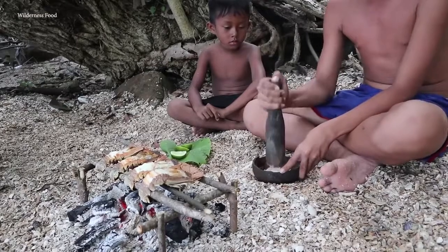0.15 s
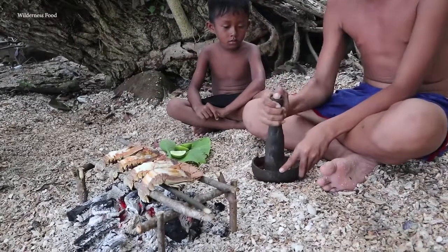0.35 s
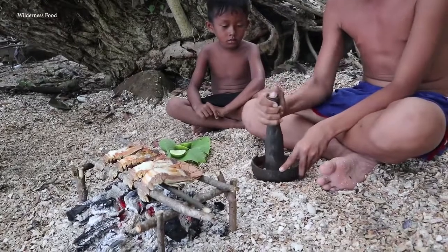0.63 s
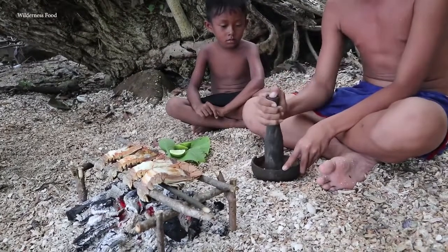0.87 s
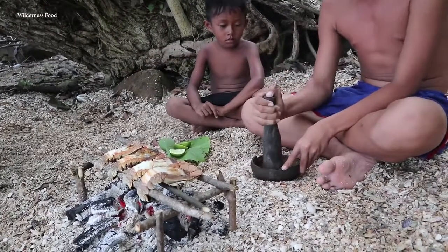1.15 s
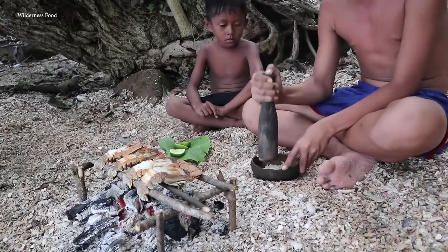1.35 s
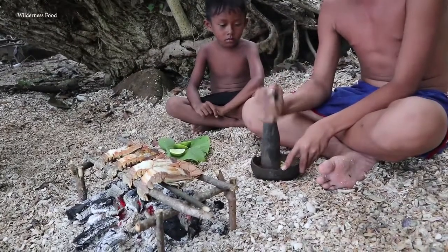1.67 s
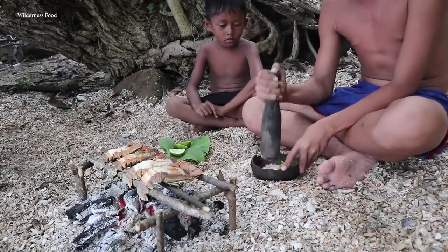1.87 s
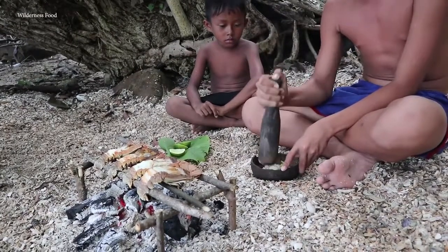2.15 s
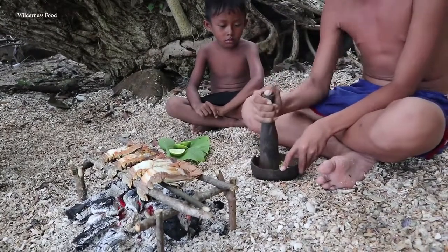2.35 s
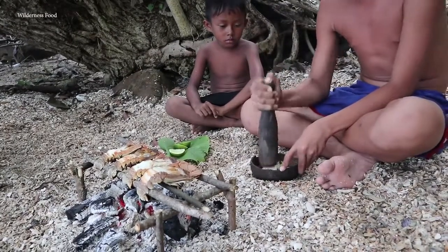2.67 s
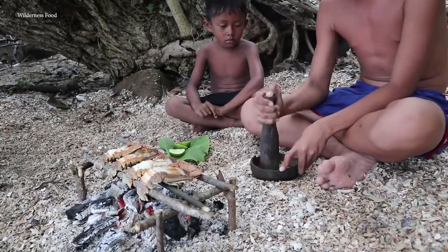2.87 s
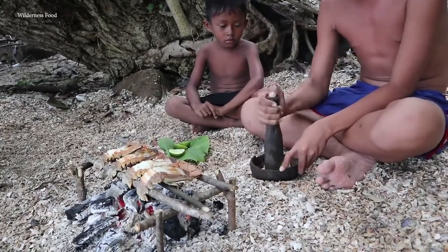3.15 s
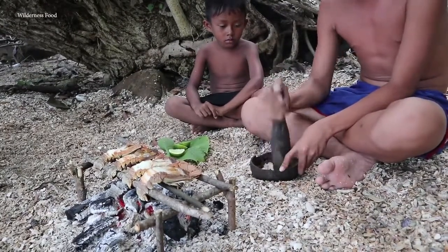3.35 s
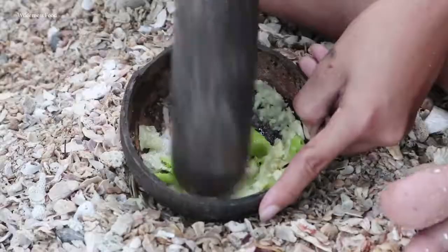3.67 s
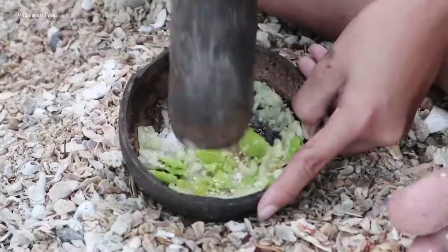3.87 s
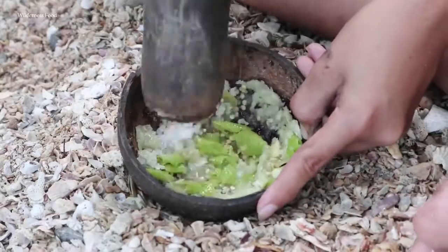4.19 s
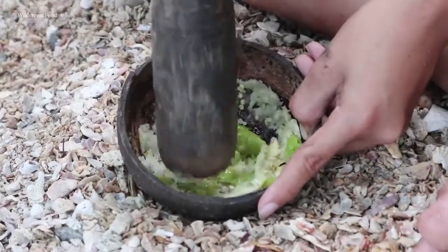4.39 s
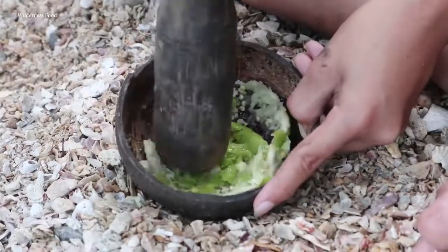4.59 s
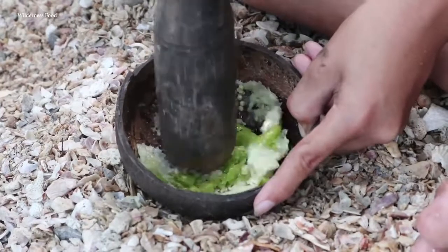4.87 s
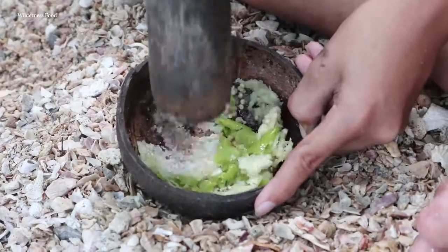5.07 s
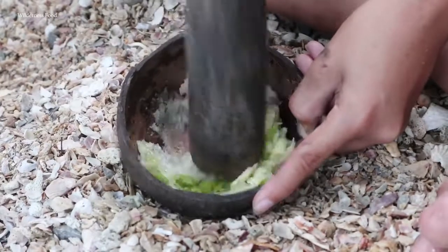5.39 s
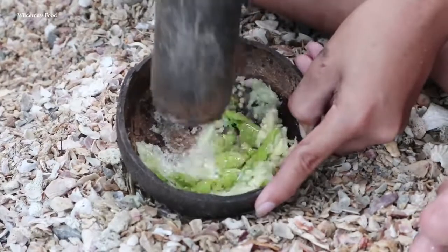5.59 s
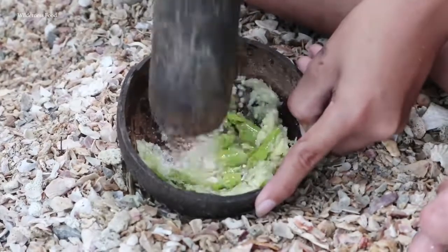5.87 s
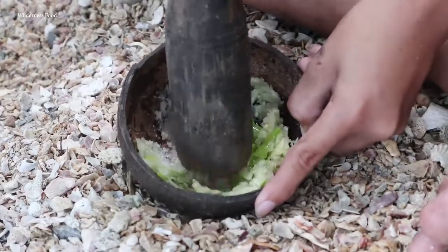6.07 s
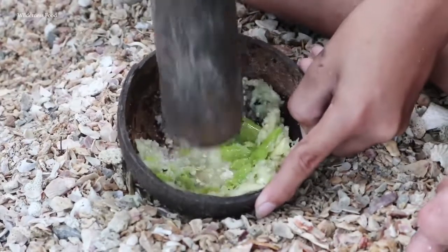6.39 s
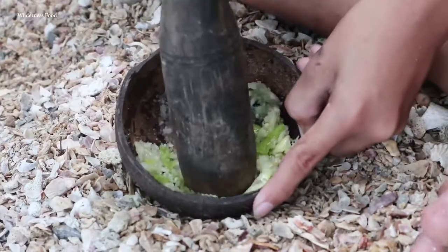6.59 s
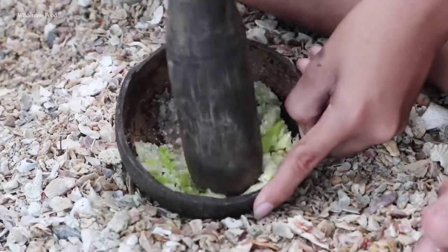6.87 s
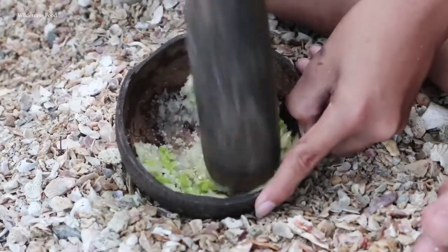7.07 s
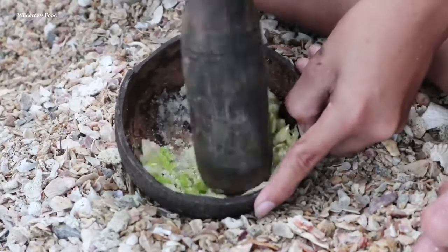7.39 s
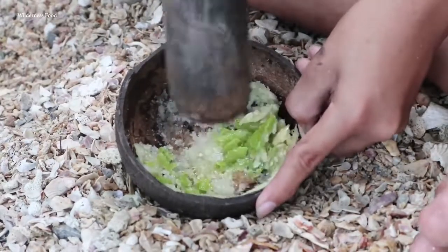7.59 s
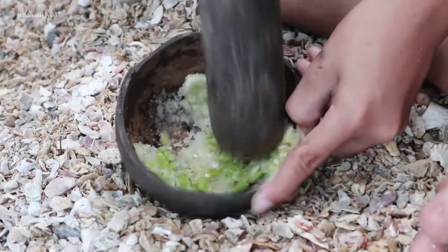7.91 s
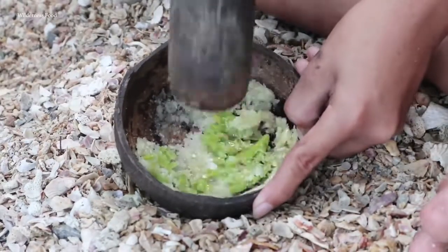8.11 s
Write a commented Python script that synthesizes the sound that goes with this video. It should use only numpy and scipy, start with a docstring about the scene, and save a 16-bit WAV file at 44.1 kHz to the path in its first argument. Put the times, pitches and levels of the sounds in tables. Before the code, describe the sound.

A wooden pestle pounds leaves and coarse grains in a coconut-shell bowl, steady crunching thuds and hollow knocks, with small waves washing and gurgling behind.

```python
"""Throughout, far breakers rumble while small waves wash, hiss and gurgle: filtered noise and gliding sines.
From 0.13 s a wooden pestle pounds leaves and coarse grains in a coconut-shell bowl on shell gravel, in steady
blows: noise grains crunch, damped modes thud and, where the food is thin, knock on the bare shell.
From 3.65 s the blows are heard close up; near 4.7 s the bowl rocks against the pestle; grit and shell bits
slip and tick between blows. Loud knocks, above all at 5.26 s, overload the microphone and pull its gain down."""
import sys
import numpy as np
from scipy import signal
from scipy.fft import rfft, irfft, next_fast_len
from scipy.io import wavfile
from scipy.ndimage import uniform_filter1d

SR = 44100
rng = np.random.default_rng(int(sys.argv[2]) if len(sys.argv) > 2 else 0)


def file_out(sig):
    """Save sig as 16-bit WAV at sys.argv[1]."""
    # one column per channel
    cols = np.atleast_2d(sig).T
    # limit, then scale
    lim = np.clip(cols, -1, 1)
    pcm = np.round(lim * 32767).astype(np.int16)
    wavfile.write(sys.argv[1], SR, pcm)


N = 363825
TIME = np.arange(N) / SR
# a short sound's own clock: 20 ms of lead-in before its time zero
LEAD = int(.02 * SR)
LOCAL = np.arange(-LEAD, 12 * LEAD) / SR


def from_db(db):
    """Decibels to gain."""
    return 10 ** (np.asarray(db) / 20)


def rms_one(x):
    """Scale to rms 1."""
    return x / np.sqrt(np.mean(x ** 2) + 1e-20)


def as_blow(x):
    """Scale a short sound to the energy of 30 ms at rms 1."""
    return x / np.sqrt(np.mean(x ** 2) * len(LOCAL) / (.03 * SR) + 1e-20)


def on_bins(points, size):
    """A table over log frequency, read at the bins of a transform."""
    hz, value = np.transpose(points)
    bin_hz = np.fft.rfftfreq(size, 1 / SR)
    return np.interp(np.log(bin_hz + 1), np.log(hz), value)


def coloured(x, spectrum):
    """Filter a signal by a table of gain over frequency."""
    size = next_fast_len(x.shape[-1])
    shaped = rfft(x, size) * from_db(on_bins(spectrum, size))
    return irfft(shaped, size)[..., :x.shape[-1]]


def add(track, s, sound):
    """Mix in a short sound whose local time zero falls at s."""
    start = max(round(s * SR) - LEAD, 0)
    track[..., start:start + len(LOCAL)] += sound[..., :N - start]


def drift(rate):
    """Slow random wander at rms 1, with rate knots per second."""
    knots = rng.standard_normal(int(N / SR * rate) + 2)
    return rms_one(np.interp(TIME * rate, np.arange(len(knots)), knots))


def stereo_noise(size, width):
    """Noise from many directions: alike at both ports in the bass, drifting apart in the treble."""
    mid, side = rng.standard_normal((2, size))
    side = signal.sosfilt(signal.butter(1, 3500, "high", fs=SR, output="sos"), side)
    return mid + width * side * np.array([[1], [-1]])


def water(spectrum, flutter_db, rate):
    """A restless band of surf noise at rms 1."""
    fluttering = stereo_noise(N, width=1.94), from_db(flutter_db * drift(rate))
    return rms_one(coloured(fluttering[0], spectrum) * fluttering[1])


# colour of the breakers' rumble: (frequency [Hz], relative level [dB per Hz])
RUMBLE_COLOUR = [(15, -19.5), (25, 3.5), (50, 2.5), (77, 14.5), (105, 5.5), (140, 8.5), (200, -11),
                 (400, -47.5)]
# swell of the far breakers: (time [s], level [dB])
BREAKER_LEVELS = [(0, -42), (3, -44.5), (5.3, -40.5), (8.25, -41)]


def breakers():
    """Far breakers arrive as a low rumble whose level swells slowly."""
    swell = from_db(np.interp(TIME, *np.transpose(BREAKER_LEVELS)))
    return swell * water(RUMBLE_COLOUR, flutter_db=1.0, rate=12)


def surge(t, waves, calm_db):
    """Strength of the water at times t: each wave swells to its crest and drains back to calm."""
    coarse = TIME[::64]
    power = from_db(calm_db) ** 2
    for s, db, rise_s, fall_s in waves:
        age = coarse - s
        shape = np.exp(-np.where(age < 0, (age / rise_s) ** 2, age / fall_s))
        power = power + (from_db(db) * shape) ** 2
    return np.interp(t, coarse, np.sqrt(power))


# small waves running up the shore, over the calm level; the foam crests later and drains longer:
# (wash crest [s], wash level [dB], foam level [dB], rise time [s], wash fall time [s])
SHORE_WAVES = [(0.081, -40.5, -42.5, 0.09, 0.23), (.29, -47, -59, .05, 0.85), (.86, -52, -49.5, 0.27, 0.21),
               (1.48, -45, -52, 0.069, 0.6), (1.9, -38.5, -45, 0.2, 0.33),
               (2.36, -40.5, -38.5, 0.085, 0.16), (2.6, -42.5, -48.5, 0.09, 0.46),
               (3.56, -49, -57, 0.35, 0.38), (3.69, -41, -46, 0.066, 0.066), (3.9, -53, -49.5, 0.21, 0.062),
               (4.56, -43.5, -44.5, 0.036, 0.0074), (4.8, -47, -50, 0.087, 0.065),
               (5.201, -48, -62.5, 0.07, 0.13), (5.44, -40.5, -52.5, 0.037, 0.078),
               (6.77, -43, -45, 0.098, 0.15), (7.11, -47, -49.5, 0.15, 0.33),
               (7.305, -53, -45, 0.061, 0.034), (7.85, -50.5, -51.5, 0.093, 0.29)]
CALM_WASH_DB = -49


def wash_strength(t):
    """How strongly the water runs on the shore at times t."""
    waves = [(s, db, rise_s, fall_s) for s, db, _, rise_s, fall_s in SHORE_WAVES]
    return surge(t, waves, CALM_WASH_DB)


# colour of the running water: (frequency [Hz], relative level [dB per Hz])
WASH_COLOUR = [(100, -27), (200, 3), (350, -1), (550, 1), (1000, -5.5), (1600, -20), (3000, -60.5)]


def wash():
    """Water running up the shore: low-mid noise that follows each wave."""
    return wash_strength(TIME) * water(WASH_COLOUR, flutter_db=1.0, rate=25)


# colours of the foam and of its finest bubbles: (frequency [Hz], relative level [dB per Hz])
FOAM_COLOUR = [(500, -24.5), (1200, 5.5), (2100, 3.5), (3200, -3.5), (5000, -34)]
FIZZ_COLOUR = [(2000, -15.5), (3800, -1.5), (6800, -9.5), (8300, -28), (16000, -63)]
CALM_FOAM_DB = -50
# the foam trails the wash [s] and drains more slowly (times the wash fall time)
FOAM_LAG_S, FOAM_LINGERS = 0.024, 1.7
# the finest bubbles hiss on between waves: level against the calm foam [dB], share of the foam's swing
FIZZ_DB, FIZZ_FOLLOWS = -5.5, 0.65


def foam():
    """Bursting bubbles hiss behind each wave; the finest fizz on between them."""
    waves = [(s, db, rise_s, FOAM_LINGERS * fall_s) for s, _, db, rise_s, fall_s in SHORE_WAVES]
    froth = surge(TIME - FOAM_LAG_S, waves, CALM_FOAM_DB)
    swing = (froth / from_db(CALM_FOAM_DB)) ** FIZZ_FOLLOWS
    fizz = from_db(CALM_FOAM_DB + FIZZ_DB) * swing * water(FIZZ_COLOUR, flutter_db=0.5, rate=35)
    return fizz + froth * water(FOAM_COLOUR, flutter_db=2.2, rate=28)


def splashing(x, lumps_db):
    """Water breaks up into splashes, each a few hundred hertz wide and some 35 ms long."""
    bins = signal.stft(x, nperseg=1024)[2]
    lumps = rng.standard_normal(bins.shape[1:])
    lumps = uniform_filter1d(lumps, size=5, axis=0)
    lumps = uniform_filter1d(lumps, size=3, axis=1)
    gain = rms_one(from_db(lumps_db * rms_one(lumps)))
    return signal.istft(bins * gain)[1][:, :N]


def sea():
    """Far breakers rumble; each near wave washes in and leaves hissing foam."""
    return breakers() + splashing(wash() + foam(), lumps_db=2.0)


# large air pockets in the lapping water: (time [s], starting pitch [Hz], level [dB], length [s])
AIR_POCKETS = [(.065, 363, -40, .035), (.265, 697, -39, 0.034), (1.638, 243, -34, 0.02),
               (1.835, 465, -35, 0.047), (1.92, 233.6, -35, 0.044), (1.972, 254, -30, 0.033),
               (1.995, 515, -33.5, 0.021), (2.081, 607, -33.5, 0.032), (2.231, 285, -28, 0.016),
               (2.25, 264, -31.5, 0.037), (2.269, 358, -35.5, 0.028), (2.635, 340, -38, 0.017),
               (3.66, 331.6, -45, 0.043), (6.745, 227, -35, 0.031)]


def gurgles(rise=0.073, small_db=-6.0, size_spread_db=11.5, cycles=6.9, waver=0.031, count=170):
    """Each trapped air pocket rings briefly, wavers and rises in pitch; many small ones ride on the wash."""
    out = np.zeros(N)
    when, pitch, size = rng.random((count, 3)).T
    times, pitches = when * N / SR, 280 * 2 ** (2.5 * pitch)
    levels = 20 * np.log10(wash_strength(times)) + small_db + size_spread_db * size
    small = list(zip(times, pitches, levels, cycles / pitches))
    for s, hz, db, length in list(AIR_POCKETS) + small:
        age = np.maximum(LOCAL, 0) / length
        wobble = waver * np.sin(2 * np.pi * (age + rng.random()))
        phase = 2 * np.pi * np.cumsum(hz * (1 + rise * age + wobble)) / SR
        envelope = (1 - np.exp(-8 * age)) * np.exp(-np.minimum(age, 4) ** 3)
        add(out, s, from_db(db) * envelope * np.sin(phase))
    return out


# between the two microphone ports: (frequency [Hz], left lead [rad])
PHASE_BETWEEN_PORTS = [(1000, 0), (2500, -.2), (4000, -.7), (5500, -1.4), (7500, -1.9), (14000, -1.9)]
# between the two microphone ports: (frequency [Hz], left minus right [dB])
BALANCE_BETWEEN_PORTS = [(900, -.2), (1500, -.4), (2400, -3), (3800, -4), (5300, -1.5), (6800, -4.5),
                         (9500, -4), (13000, -1)]


def ports(x):
    """A near source reaches the two microphone ports with different delay and shading."""
    size = next_fast_len(len(LOCAL))
    # each port takes half of the difference
    shading = from_db(on_bins(BALANCE_BETWEEN_PORTS, size) / 2)
    half = shading * np.exp(.5j * on_bins(PHASE_BETWEEN_PORTS, size))
    return irfft(rfft(x, size) * np.array([half, 1 / half]), size)[:, :len(LOCAL)]


def scatter(x, db, t60, onset_s, dull_hz):
    """Diffuse reflections that build up and die away."""
    t = TIME[:len(LOCAL)]
    envelope = from_db(-60 * t / t60) * (1 - np.exp(-(t / onset_s) ** 2))
    echoes = stereo_noise(len(t), width=1) * envelope
    echoes = echoes / np.sqrt(np.sum(echoes ** 2) / 2)
    echoes = signal.sosfilt(signal.butter(1, min(dull_hz, SR / 3), fs=SR, output="sos"), echoes)
    return from_db(db) * signal.fftconvolve(x[None], echoes, axes=1)[:, :len(t)]


# rock echo before its colouring, against the direct sound [dB], from afar and close up
FAR_ROCKS_DB, CLOSE_ROCKS_DB = -13.5, -17


def outdoors(x, rocks_db):
    """Direct sound, quick reflections off ground and bodies, a faint rock tail; paths shift every time."""
    mid = x.mean(axis=0)
    ground = scatter(mid, db=-10.5, t60=0.037, onset_s=0.0021, dull_hz=9000)
    rocks = scatter(mid, db=rocks_db, t60=0.28, onset_s=0.0058, dull_hz=4520)
    # rough roots and rock send back little of the knock's low tone and of the top treble
    rocks = coloured(rocks, [(200, 3.0), (550, -6.0), (750, -10.0), (1100, -3.0), (2500, -2.5),
                             (6000, 0.5), (11000, -2.5)])
    return ports(x) + ground + rocks


def ring(modes, stretch, contact_s, scatter_db, detune, signs=None, lag_s=0):
    """Damped modes, scaled in pitch and scattered by chance, building up during the contact."""
    t, out = np.maximum(LOCAL - lag_s, 0), 0
    for (hz, db, t60), sign in zip(modes, signs or np.ones(len(modes))):
        decay_db = np.minimum(60 * t / t60, 200)
        strength = sign * from_db(db + scatter_db * rng.standard_normal() - decay_db)
        mode_hz = hz * stretch * (1 + detune * rng.standard_normal())
        out = out + strength * np.sin(2 * np.pi * mode_hz * t)
    out = out * (1 - np.exp(-t / contact_s))
    # a small body radiates little below its lowest mode
    radiation = signal.butter(1, modes[0][0] / 2, "high", fs=SR, output="sos")
    return as_blow(signal.sosfilt(radiation, out))


# colour of crushed food close up, also used for grit: (frequency [Hz], relative level [dB per Hz])
CLOSE_CRUNCH_COLOUR = [(400, 2.5), (1300, -2), (1550, -3), (2000, -6.5), (2250, -0.5), (2600, -3),
                       (3500, 1.5), (4600, -1.5), (5100, -2.5), (6500, -2.5), (7200, -5.5), (10500, -11),
                       (13000, -15.5), (16000, -34.5)]


def grains(envelope, spread_db, brightness_db, colour=CLOSE_CRUNCH_COLOUR):
    """Countless tiny fractures of uneven size under an envelope, spread in stereo."""
    # fractures come in clumps a fraction of a millisecond long
    clumps = np.clip(rng.standard_normal(len(LOCAL)), -2, 2)[np.arange(len(LOCAL)) // 12]
    cracks = stereo_noise(len(LOCAL), width=0.37) * from_db(spread_db * clumps) * envelope
    return coloured(coloured(cracks, colour), [(3800, 0), (7500, brightness_db)])


# usual modes of a bit of shell, before retuning: (frequency [Hz], relative level [dB], t60 [s])
SHELL_BIT_MODES = [(2690, -10, 0.0048), (3730, 7.5, 0.018), (4760, -3.5, 0.011), (6310, 2, .005),
                   (9300, -15.5, 0.003)]


def chip(hz):
    """One bit of shell is struck and rings briefly, its second mode near hz."""
    stretch = hz / SHELL_BIT_MODES[1][0]
    return ring(SHELL_BIT_MODES, stretch, contact_s=.0002, scatter_db=4.0, detune=0.043)


def tumble(envelope, count=4):
    """Bits of shell of a few sizes knock together at random under an envelope."""
    out, chips_per_s = 0, 520
    for hz in np.geomspace(3300, 4700, count):
        struck = rng.random(len(LOCAL)) < chips_per_s / count / SR
        clicks = struck * rng.standard_normal(len(LOCAL))
        out = out + signal.fftconvolve(clicks * envelope, chip(hz))[LEAD:LEAD + len(LOCAL)]
    return as_blow(out)


# grit shifting in the bowl and shell gravel beneath it: (time [s], level [dB], decay time [s])
GRAVEL_SLIPS = [(.134, -35.5, 0.015), (1.551, -37, 0.0075), (1.835, -43, .025), (4.398, -36, 0.0065),
                (4.682, -30.5, 0.015), (4.778, -45.5, 0.01), (4.931, -39.5, 0.0068), (4.969, -33, 0.016),
                (5.003, -40, 0.018)]


def gravel(rise_s=0.003, spread_db=7.5, grit_db=-7.0, chips_db=-8.5):
    """Grit and bits of shell slip against each other and come to rest."""
    out = np.zeros((2, N))
    for s, db, decay_s in GRAVEL_SLIPS:
        slip = np.exp(-np.abs(LOCAL) / np.where(LOCAL < 0, rise_s, decay_s))
        grit = as_blow(grains(slip, spread_db, brightness_db=3.5))
        mix = from_db(grit_db) * grit + from_db(chips_db) * tumble(slip)
        add(out, s, from_db(db) * ports(mix))
    return out


# single bits of shell that snap or tip over: (time [s], level of the snap [dB], pitch [Hz])
SHELL_TICKS = [(0.1808, -50, 4340), (3.189, -46, 3160), (4.003, -56, 4630), (4.0578, -50, 4770),
               (4.66, -44, 3400), (4.7015, -53, 3840), (7.535, -46.5, 3400), (7.8482, -49, 4000),
               (8.0713, -48, 3370)]


def ticks(snap_s=.0018, spread_db=7.5, ping_db=-4):
    """A single bit of shell snaps with a burst of grains and pings at its modes."""
    out = np.zeros((2, N))
    for s, db, hz in SHELL_TICKS:
        snap = as_blow(grains(np.exp(-np.abs(LOCAL) / snap_s), spread_db, brightness_db=-5))
        add(out, s, from_db(db) * outdoors(snap + from_db(ping_db) * chip(hz), CLOSE_ROCKS_DB))
    return out


# usual modes of the bowl bouncing on the gravel: (frequency [Hz], relative level [dB], t60 [s])
BOUNCE_MODES = [(177, 2, 0.031), (318, -8.5, .018)]
# the bowl sinks into the gravel a moment after the pestle lands
THUD_LAG_S = 0.00057


def thud(hz):
    """The bowl bounces on the gravel, its lowest mode near hz."""
    return ring(BOUNCE_MODES, hz / BOUNCE_MODES[0][0], contact_s=0.0019, scatter_db=2.5, detune=0.018,
                lag_s=THUD_LAG_S)


# usual modes of the bowl flexing as a whole: (frequency [Hz], relative level [dB], t60 [s])
FLEX_MODES = [(340, -10, .009), (601, 0, 0.016), (754, 2, 0.016), (976, -14.5, 0.0073)]
# polarity of each flexing mode; the third swings against its neighbours and fills the band between: (sign)
FLEX_SIGNS = [1, 1, -1, 1]
# pitch favours the modes above or below the usual [dB per octave of mode, per octave of pitch]
# and bends them a little (exponent on the pitch ratio)
USUAL_KNOCK_HZ, KNOCK_TILT_DB, KNOCK_BEND = 704.5, 26.5, 0.43


def knock(hz):
    """The bare shell flexes as a whole; its pitch tilts and bends the modes."""
    pitch = hz / USUAL_KNOCK_HZ
    tilt_db = KNOCK_TILT_DB * np.log2(pitch)
    struck = [(mode_hz, db + tilt_db * np.log2(mode_hz / USUAL_KNOCK_HZ), t60)
              for mode_hz, db, t60 in FLEX_MODES]
    return ring(struck, pitch ** KNOCK_BEND, contact_s=0.00023, scatter_db=2.5, detune=0.012,
                signs=FLEX_SIGNS)


# usual modes of the bowl flexing at the wall: (frequency [Hz], relative level [dB], t60 [s])
WALL_MODES = [(958, -3, 0.013), (1109, 2, 0.017), (1259, -1.5, 0.015), (2240, -20.5, 0.0035)]


def clack(hz):
    """The bowl flexes at the wall, its second mode near hz."""
    return ring(WALL_MODES, hz / WALL_MODES[1][0], contact_s=0.004, scatter_db=1.3, detune=0.018)


def bowl(thud_db, thud_hz, knock_db, knock_hz, clack_db, clack_hz):
    """The bowl bounces on the gravel (opposite polarity), flexes as a whole and clacks at the wall."""
    bounce = from_db(thud_db) * thud(thud_hz)
    flex = from_db(knock_db) * knock(knock_hz)
    return flex + from_db(clack_db) * clack(clack_hz) - bounce


# the first tap [s, dB], then the gap [s] and loss [dB] from tap to tap
ROCK_S, ROCK_DB, ROCK_GAP_S, ROCK_LOSS_DB = 4.677, -34, .011, 4


def rocking(count=3):
    """The tipped bowl rocks back and taps the pestle, weaker each time."""
    out = np.zeros(N)
    for k in range(count):
        tap = ring(FLEX_MODES, 1, contact_s=.0006, scatter_db=3.0, detune=.1)
        add(out, ROCK_S + k * ROCK_GAP_S, from_db(ROCK_DB - k * ROCK_LOSS_DB) * tap)
    return out


# the crunch peaks this share of its length after the pestle lands
CRUNCH_PEAK_SHARE = 0.37


def crunch(length, colour, bright_db, swell_s=0.0013, fall=0.48, settle_db=-23, settle_s=0.0024):
    """The crunch swells as food is squeezed and dies as the pestle bottoms out, with a faint settling."""
    t = LOCAL - CRUNCH_PEAK_SHARE * length
    span = np.where(t < 0, np.sqrt(swell_s * length), fall * length)
    squeeze = np.exp(-(np.abs(t) / span) ** np.where(t < 0, 1.3, 1.1))
    settle = from_db(settle_db) * np.exp(-np.abs(t) / settle_s) * (t > 0)
    return grains(squeeze + settle, spread_db=5.5, brightness_db=bright_db, colour=colour)


# lift at the centre [dB] and bandwidth [Hz] of the wall's rasp
RASP_DB, RASP_WIDTH_HZ = 7, 450


def rasp(x, hz):
    """One resonance of the bowl's wall, set by where the pestle lands, lifts a narrow band of the crunch."""
    b, a = signal.iirpeak(hz, hz / RASP_WIDTH_HZ, fs=SR)
    return as_blow(x + (from_db(RASP_DB) - 1) * signal.lfilter(b, a, x))


# the microphone moves in close to the bowl at this time: crunch colour and rock echo switch
CLOSE_UP_S = 3.65
# a heavier thud brightens the crunch [dB of treble per dB of thud]
USUAL_THUD_DB, BRIGHT_PER_THUD = -27.5, 0.11
# colour of crushed food from afar: (frequency [Hz], relative level [dB per Hz])
FAR_CRUNCH_COLOUR = [(400, 6), (1300, -0.5), (1600, -4.5), (1900, 1.5), (2300, -4.5), (2900, -2.5),
                     (3500, 1), (4150, 5), (4550, 0.5), (5400, 1.5), (7400, -2.5), (10500, -4.5),
                     (13000, -15), (16000, -25)]
# pestle blows: (time [s], thud level [dB], thud pitch [Hz], knock level [dB], knock pitch [Hz],
# clack level [dB], clack pitch [Hz], crunch level [dB], crunch length [s], rasp pitch [Hz])
PESTLE_BLOWS = [(.129, -31.5, 146, -31.5, 616, -39.5, 1230, -32.5, 0.0062, 4240),
                (0.395, -29, 146, -40, 830, -31, 1230, -28, 0.0054, 7440),
                (0.695, -23, 171.4, -29, 560, -38.5, 1190, -28.5, 0.005, 6200),
                (.980, -29.5, 173, -32, 504, -37, 1333, -28.5, .006, 6600),
                (1.25, -42.5, 177, -55, 695, -53, 1230, -37.5, 0.0089, 3450),
                (1.541, -31, 150, -43, 746, -66, 1340, -33, 0.0054, 3960),
                (1.817, -24.5, 174, -52, 590, -44, 1180, -28, 0.0037, 7450),
                (2.113, -22.5, 173, -21, 674, -31.5, 1235, -25, 0.0022, 5900),
                (2.393, -24, 161, -17.5, 740, -35.5, 1355, -25.5, 0.0017, 6640),
                (2.666, -24, 168, -19.5, 710, -29.5, 1250, -26, 0.0025, 5620),
                (2.9417, -26, 180, -14.5, 800, -23.5, 1196, -26.5, 0.0018, 7340),
                (3.231, -24.5, 173, -45, 520, -45, 1036, -31, 0.0025, 7540),
                (3.498, -42.5, 159, -53, 600, -50, 1290, -42, 0.0064, 4050),
                (3.821, -25, 175, -37, 690, -35.5, 1180, -24.5, 0.007, 3690),
                (4.1038, -23.5, 168, -34, 614, -36, 944, -25, .0038, 5840),
                (4.3865, -32, 133, -16, 616, -27, 1095, -23, 0.0038, 4500),
                (4.670, -31.5, 185, -25.5, 710, -30, 1150, -25.5, 0.015, 5500),
                (4.949, -30.5, 209, -15, 710, -23, 1087, -24, 0.0068, 5750),
                (5.2554, -23.5, 135, -5.5, 747, -14.5, 1138, -15, 0.0017, 3514),
                (5.534, -21.5, 134.3, -23, 740, -25.5, 1220, -17.5, 0.0031, 3850),
                (5.8148, -18.5, 154.5, -33, 776, -32, 1220, -18, 0.0045, 4520),
                (6.095, -23, 149.5, -24.5, 590, -29, 1364, -18, 0.0057, 3970),
                (6.36, -25.5, 157.6, -24.5, 580, -30.5, 1200, -20, 0.0071, 4250),
                (6.652, -28.5, 187, -29.5, 675, -42, 1220, -25.5, 0.01, 2960),
                (6.932, -22, 168, -24, 636, -40.5, 1170, -24.5, 0.0036, 3520),
                (7.215, -36, 202, -36, 790, -42, 1150, -31, 0.0067, 2800),
                (7.492, -23.5, 199, -32, 516, -29.5, 1133, -28.5, 0.0051, 2250),
                (7.7868, -29, 143, -33, 870, -36, 1133, -23, 0.0057, 3850),
                (8.052, -28.5, 140, -41, 765, -35, 1225, -24.5, 0.0086, 3200)]


def pounding():
    """Each blow crushes the food and drives the bowl."""
    out = np.zeros((2, N))
    for s, thud_db, *body, crunch_db, length, rasp_hz in PESTLE_BLOWS:
        colour, rocks_db = CLOSE_CRUNCH_COLOUR, CLOSE_ROCKS_DB
        if s < CLOSE_UP_S:
            colour, rocks_db = FAR_CRUNCH_COLOUR, FAR_ROCKS_DB
        bright_db = BRIGHT_PER_THUD * (thud_db - USUAL_THUD_DB)
        food = rasp(crunch(length, colour, bright_db), rasp_hz)
        blow = from_db(crunch_db) * food + bowl(thud_db, *body)
        add(out, s, outdoors(blow, rocks_db))
    return out


def scene():
    """The sea behind, the bowl close by."""
    return sea() + gurgles() + gravel() + ticks() + rocking() + pounding()


CUTOFF_HZ = 16000


def record(dry, threshold_db=-9.5, release_db_per_s=11.0, attack_s=0.024):
    """Gain control ducks after loud knocks and recovers slowly; what gets past its attack is clipped."""
    # power over some 3 ms
    power = signal.lfilter(np.ones(128) / 128, 1, np.mean(dry ** 2, axis=0))
    over = np.maximum(10 * np.log10(power + 1e-12) - threshold_db, 0)
    # hold the largest overshoot, letting go at the release rate
    release = release_db_per_s * TIME
    held = np.maximum.accumulate(over + release) - release
    pole = np.exp(-1 / (attack_s * SR))
    ducked = dry * from_db(-signal.lfilter([1 - pole], [1, -pole], held))
    lowpass = signal.ellip(10, .1, 90, CUTOFF_HZ, fs=SR, output="sos")
    return signal.sosfilt(lowpass, np.clip(ducked, -.97, .97))


dry = scene()
out = record(dry)
file_out(out)
```